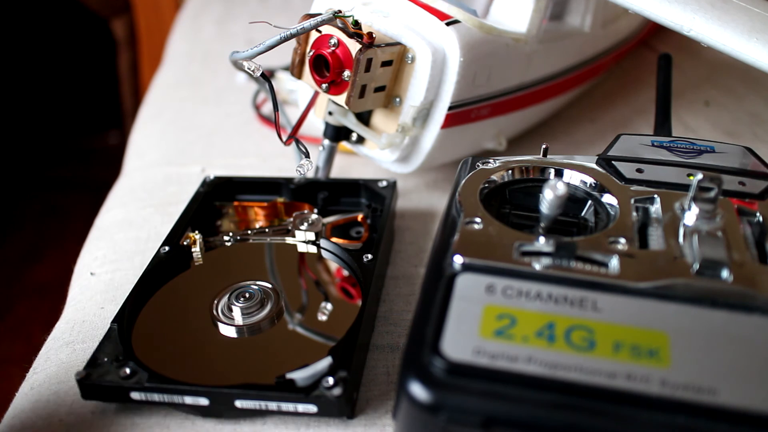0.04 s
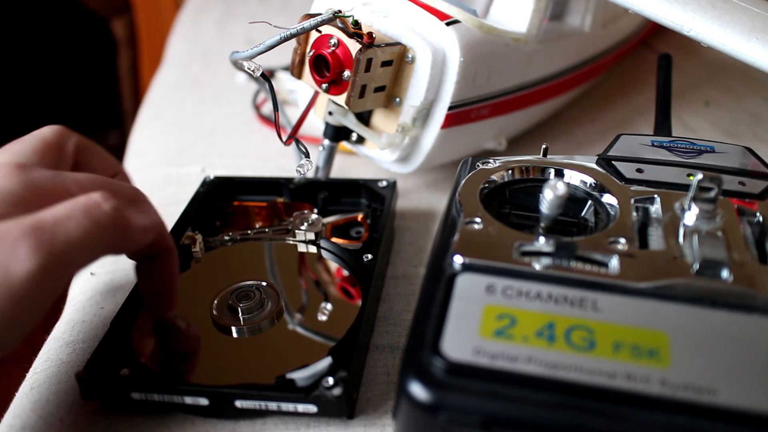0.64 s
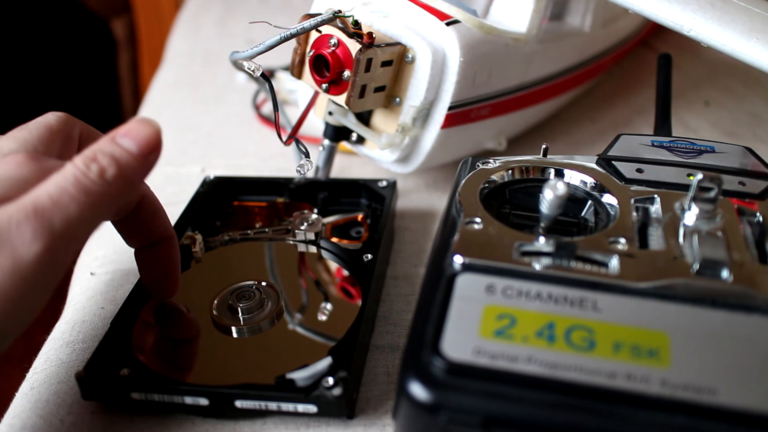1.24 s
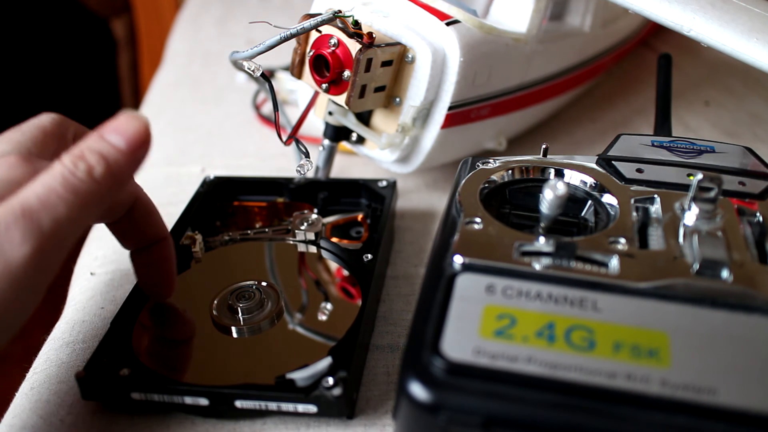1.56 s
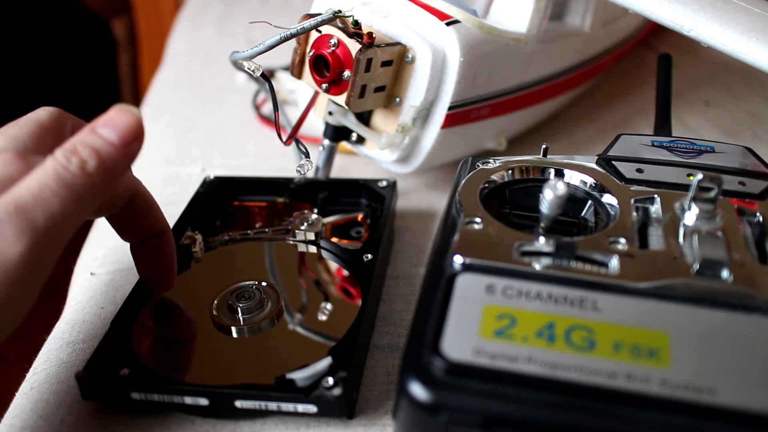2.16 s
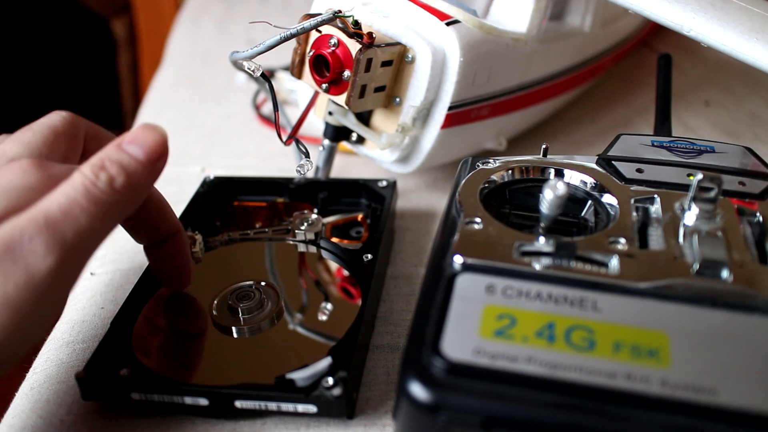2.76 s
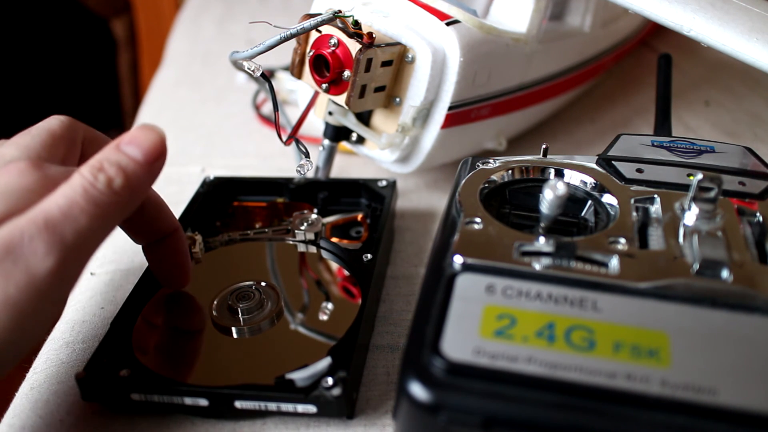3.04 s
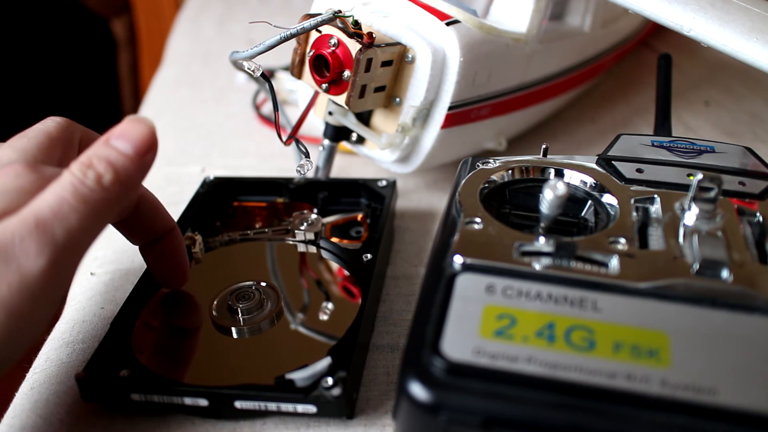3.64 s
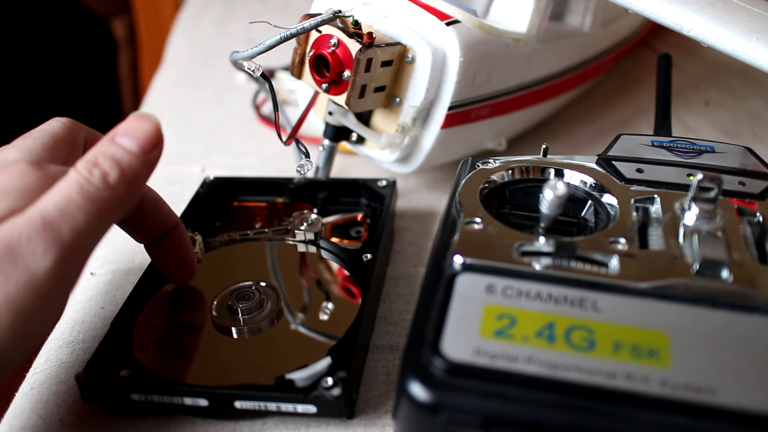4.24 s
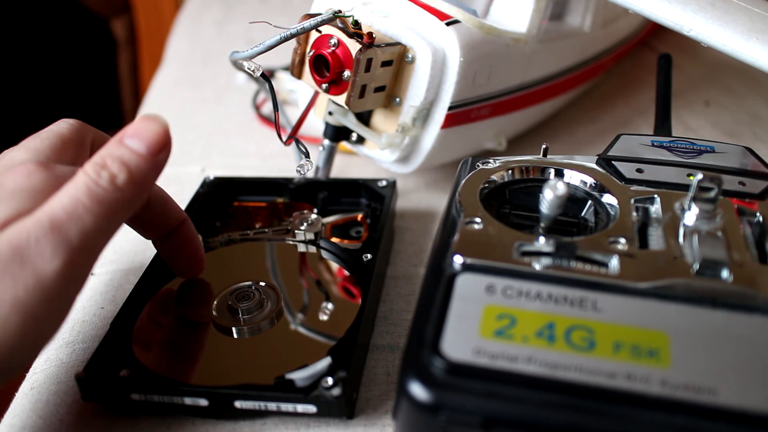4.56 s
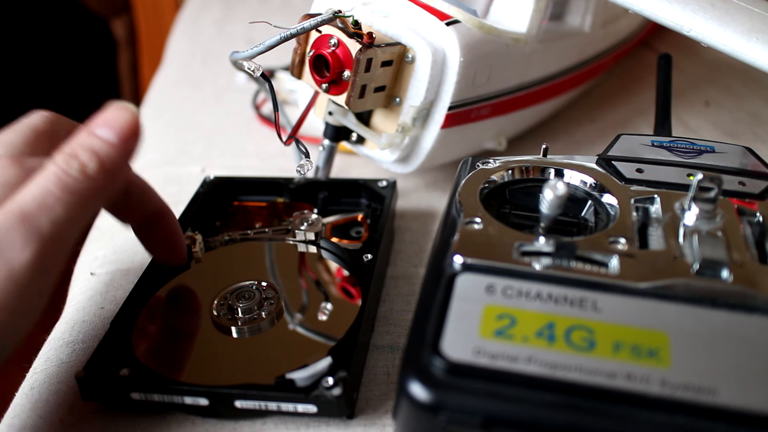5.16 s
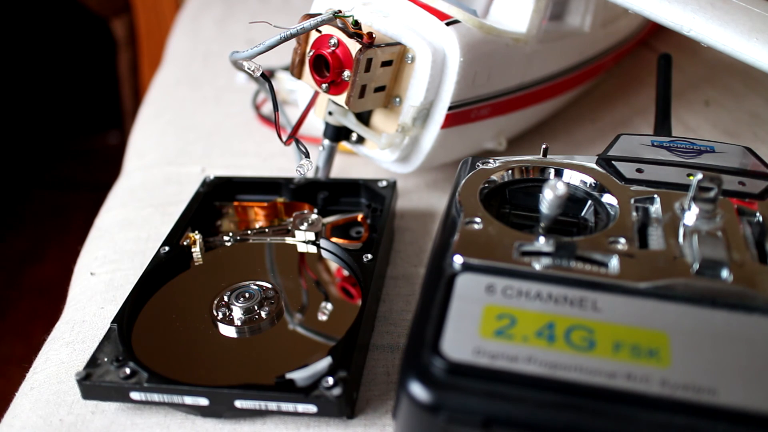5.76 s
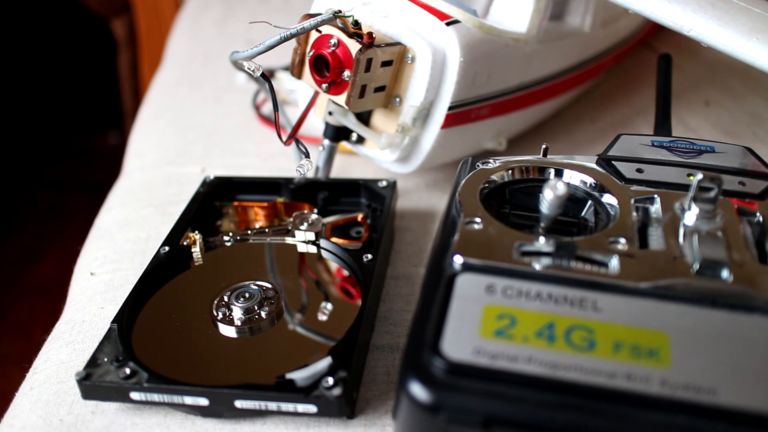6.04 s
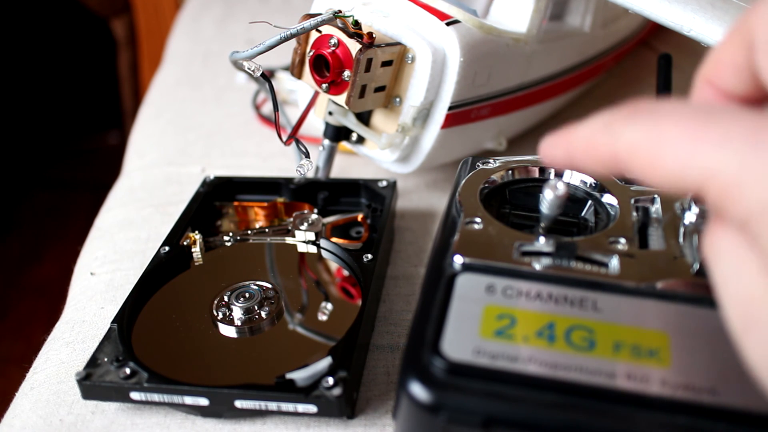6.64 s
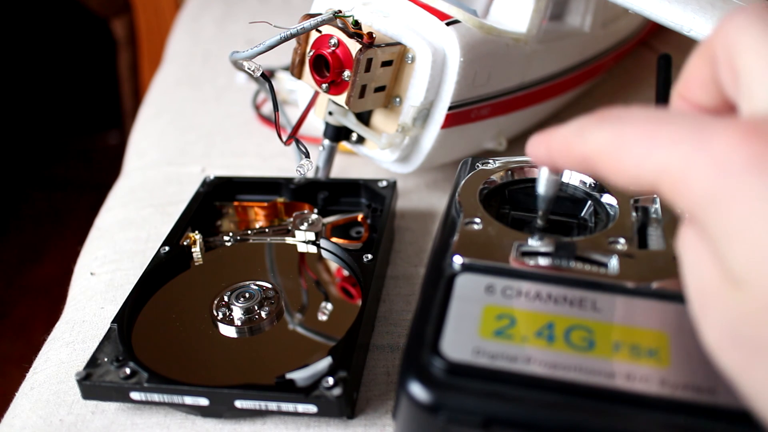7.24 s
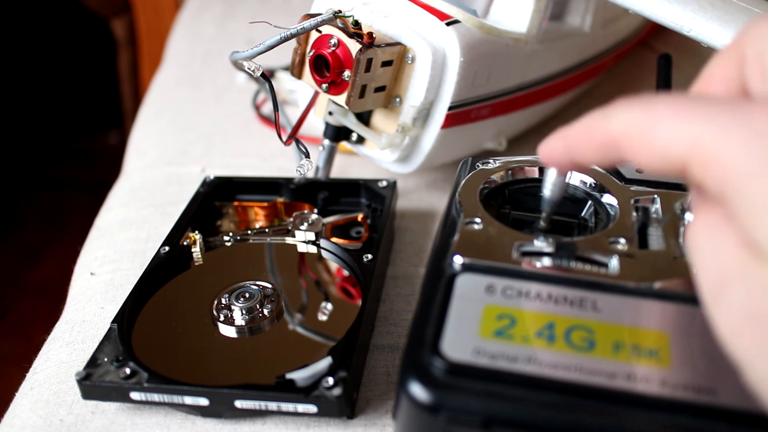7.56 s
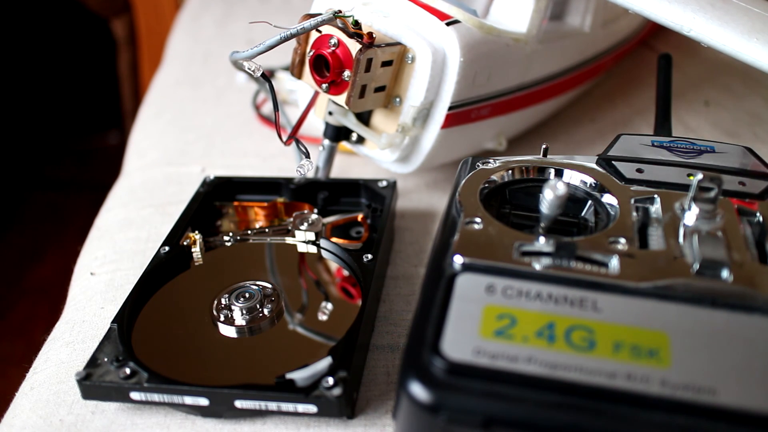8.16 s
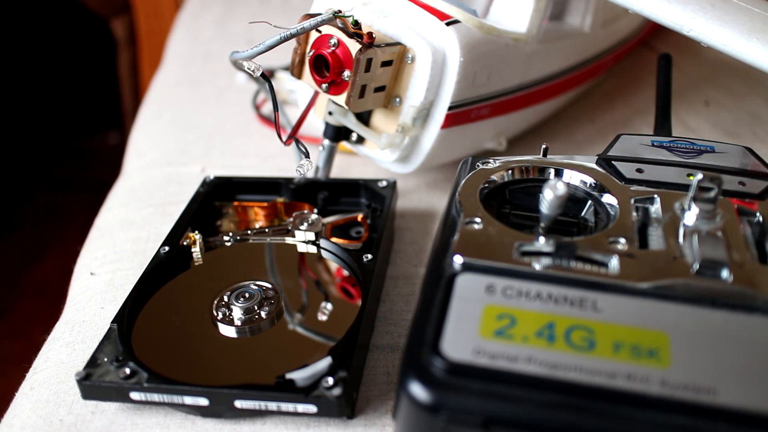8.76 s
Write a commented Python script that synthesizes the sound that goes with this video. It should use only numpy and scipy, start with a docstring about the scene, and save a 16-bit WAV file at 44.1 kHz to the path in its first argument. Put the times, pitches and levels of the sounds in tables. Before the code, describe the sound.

A fingertip brakes a whirring hard drive platter with hissing rubs, followed by faint servo buzzing and sharp plastic knocks.

```python
"""An open hard drive coasts on a cloth-covered table in a quiet room, its bearing rushing and whining.
A fingertip brakes the platter in short presses, and the rubbing skin makes the disc hiss and ring.
The rush fades and the whines glide down; just before the platter stops, a small servo starts to buzz
at its frame rate. A sleeve rustles over to the transmitter stick, the servo whirrs and jerks, and thin
whistles set in. The stick knocks back, ringing the plastic case, and the hand scuffs it as it leaves."""
import sys
import numpy as np
from scipy import signal
from scipy.fft import rfft, irfft
from scipy.io import wavfile
from scipy.ndimage import uniform_filter1d, map_coordinates

SR = 44100
rng = np.random.default_rng(int(sys.argv[2]) if len(sys.argv) > 2 else 0)


def materialize(psi):
    """Save the field psi as 16-bit PCM at rate SR to the path in sys.argv[1].

    A 1-D psi becomes a single channel; in a 2-D psi each row is a channel.
    """
    bounded = np.clip(np.atleast_2d(psi).T, -1, 1)
    quanta = np.round(bounded * 32767).astype(np.int16)
    wavfile.write(sys.argv[1], SR, quanta)


N = 396900
TIME = np.arange(N) / SR
FREQS = np.maximum(np.arange(N // 2 + 1) * SR / N, 1)
START_SPEED = 79.12   # platter turns per second
SLOW_TURN_S = (7.228, 7.356)   # start and end of the servo's slow turn
# Fingertip presses. Each row: start and end in seconds, turns per second lost, hiss and disc ring
# in relative dB.
PRESSES = [(0.662, 0.802, 0.51, -50, -58), (1.063, 1.307, 0.58, -64, -48), (1.333, 1.468, 0.91, -61, -55),
           (1.485, 1.647, 1.23, -51, -58), (1.638, 1.801, 1.23, -63, -59), (1.781, 1.93, 2.76, -51, -53.5),
           (2.012, 2.138, 1.71, -48.5, -46.5), (2.211, 2.379, 1.32, -50.5, -47),
           (2.411, 2.53, 1.63, -42, -47), (2.582, 2.8, 1.51, -53, -51.5), (2.805, 2.964, 1.38, -40, -49.5),
           (3.018, 3.243, 3.82, -41, -44.5), (3.336, 3.521, 2.63, -42, -46), (3.601, 3.871, 10, -41, -42.5),
           (3.798, 4.251, 6.45, -47.5, -48), (4.213, 4.345, 2.46, -50.5, -45),
           (4.299, 4.552, 4.3, -56, -53.5), (4.5, 4.72, 4.23, -55.5, -53.5),
           (4.679, 4.902, 4.5, -61, -58.5), (4.862, 5.047, 3.2, -76, -58.5)]


def from_db(db):
    """Decibels to gain."""
    return 10 ** (np.asarray(db) / 20)


def level(rows):
    """Gain curve through points of seconds and dB; it dies away quickly beyond its ends."""
    s, db = np.transpose(rows)
    outside = np.maximum(s[0] - TIME, 0) + np.maximum(TIME - s[-1], 0)
    return from_db(np.interp(TIME, s, db) - np.minimum(150 * outside, 100))


def held(span, fade_s):
    """Gain 1 between two times, with short fades."""
    return np.clip(np.minimum(TIME - span[0], span[1] - TIME) / fade_s + .5, 0, 1)


def swells(rows):
    """Bell-shaped swells, each with its own rise and fall."""
    power = np.zeros(N)
    for s, rise, fall, db in rows:
        distance = (TIME - s) / np.where(TIME < s, rise, fall)
        power += from_db(db) ** 2 * np.exp(-2 * np.minimum(distance ** 2, 20))
    return np.sqrt(power)


def colour(points):
    """EQ gain through points of Hz and dB, joined over log frequency."""
    hz, db = np.transpose(points)
    return from_db(np.interp(np.log(FREQS), np.log(hz), db))


def resonances(modes):
    """Frequency response of parallel resonators with alternating signs."""
    return sum((-1) ** k * from_db(db) / (1 + 1j * (FREQS ** 2 - hz ** 2) / (FREQS * width))
               for k, (hz, width, db) in enumerate(modes))


def peaks(modes):
    """Gain of resonators that are each shaken on their own, so that powers add."""
    return np.sqrt(sum(from_db(db) ** 2 / (1 + ((FREQS ** 2 - hz ** 2) / (FREQS * width)) ** 2)
                       for hz, width, db in modes))


def shaped(source, gain, band=(0, SR)):
    """Filters a signal, scaled so that unit white noise has rms 1 inside the band in Hz."""
    inside = (FREQS > band[0]) & (FREQS < band[1])
    return irfft(rfft(source) * gain / np.sqrt(np.mean(np.abs(gain) ** 2 * inside)), N)


def drift(rate_hz):
    """A smooth random wander of rms 1."""
    return shaped(rng.standard_normal(N), 1 / (1 + (FREQS / rate_hz) ** 2))


def noise(grain_db=0.0, rate_hz=200):
    """White noise of rms 1; grain makes it come in clumps."""
    x = rng.standard_normal(N) * from_db(grain_db * drift(rate_hz))
    return x / x.std()


def glide(hz):
    """A sine of rms 1 on a moving pitch."""
    return np.sqrt(2) * np.sin(2 * np.pi * (np.cumsum(hz) / SR + rng.random()))


def track_noise(turns, repeat, size=1024):
    """Noise in which the share `repeat` is the same rough track coming round on every turn."""
    bins = np.arange(size // 2 + 1)
    bumps = irfft(np.exp(2j * np.pi * rng.random(len(bins))) * (bins < size // 4))
    track = map_coordinates(bumps, [turns % 1 * size], order=1, mode="grid-wrap")
    # a slower track packs its power into a narrower band
    track *= np.sqrt(np.gradient(turns) * size / 2) / bumps.std()
    return np.sqrt(repeat) * track + np.sqrt(1 - repeat) * noise(grain_db=1.5, rate_hz=63)


def pressure(start, end):
    """One press of the finger: its samples and a half sine of height 1."""
    span = slice(int(start * SR), int(end * SR))
    return span, np.abs(np.sin(np.linspace(0, np.pi, len(TIME[span]))))


def room_tone():
    """A quiet, very wide bed of rumble and hiss."""
    # Room spectra, mid and side. Each row: frequency in Hz, relative level in dB.
    mid_colour = [(15, -39), (25, -11), (86, -2.5), (301, -9.5), (326, -6.5), (475, -7.5), (604, -11.5),
                  (709, -8.5), (769, -12), (1390, -9), (1500, -12), (5880, -20), (15000, -25.5)]
    side_colour = [(15, -37), (25, -12.5), (278, -6), (475, -7.5), (573, -8), (978, -8.5), (1500, -10),
                   (2930, -18.5), (3930, -18), (4750, -24.5), (15000, -27)]
    mid = from_db(-60) * shaped(noise(), colour(mid_colour))
    side = from_db(-56.5) * shaped(noise(), colour(side_colour))
    return mid + side * [[1], [-1]]


def platter(drag=4.32):
    """Speed in turns per second, and the finger's braking; drag and braking are speed lost per second."""
    braking = np.zeros(N)
    for start, end, lost, _, _ in PRESSES:
        span, press = pressure(start, end)
        braking[span] += lost * press * SR / press.sum()
    return np.maximum(START_SPEED - np.cumsum(drag + braking) / SR, 0), braking


def spindle(speed, turns, braking):
    """Rolling balls shake the frame: ringing races, a hum and a rush that sinks as the platter slows."""
    # Body and treble of the rush. Each row: frequency in Hz, relative level in dB.
    body_colour = [(60, -79), (150, -18.5), (300, -10), (600, -7.5), (1000, 0), (1400, 1), (2300, -2),
                   (3100, 5), (3600, 1.5), (4400, 1.5), (5000, -4), (6000, -39)]
    treble_colour = [(3800, -25.5), (4800, -6), (5300, -1.5), (6300, -1.5), (7200, -3), (8200, -1.5),
                     (9000, -5.5), (10000, -8), (11000, -15), (12500, -17.5), (16000, -22)]
    # Frame and bearing resonances. Each row: frequency and width in Hz, relative level in dB.
    frame_modes = [(277, 10, -5), (450, 150, 0.5), (658, 66, 3.5), (1010, 15, -3.7), (1429, 39, -0.2),
                   (1543, 13, 1), (1656, 13, 6), (1770, 4.5, -18), (2044, 7.4, -5), (1987, 19, 3),
                   (2060, 18, -2.2), (2156, 34, 2.5)]
    bearing_modes = [(1894, 8.5, -7), (2144, 22, -2.5), (3025, 79, -4.5), (3757, 160, 0.5), (4360, 65, -27),
                     (5060, 56, -7)]
    # Envelopes of the bearing rattle and the hum. Each row: time in seconds, level in dB.
    rattle_levels = [(0, -66), (.8, -57), (1.6, -51), (2.9, -46.5), (3.55, -49), (4.2, -44.5), (4.75, -55),
                     (5.05, -64)]
    hum_levels = [(0, -55.5), (.6, -66), (1.2, -79), (1.32, -62), (1.8, -63.5), (2.1, -71), (2.3, -85)]
    frame = colour(body_colour) * np.sqrt(1 + (1.25 * peaks(frame_modes)) ** 2)
    body = shaped(track_noise(turns, repeat=.35), frame, band=(1200, 2700))
    treble = shaped(noise(grain_db=1.0), colour(treble_colour), band=(5300, 6400))
    pace = speed / START_SPEED
    load = from_db(-38) * braking * pace   # braking lifts the rush
    rush = from_db(-39) * np.hypot(pace ** 2.21, load) * body
    rush += from_db(-45.5) * np.hypot(pace ** 2.37, 0.55 * load) * treble
    # the races are loaded once a turn, so the rattle flutters as it slows
    flutter = from_db(2.1 * (1 - pace) * np.sin(2 * np.pi * turns))
    races = flutter * track_noise(turns, repeat=0.57, size=2048)
    rattle = level(rattle_levels) * shaped(races, peaks(bearing_modes) ** 0.97)
    hum = level(hum_levels) * np.sqrt(2) * np.sin(4 * np.pi * turns)
    return rush + rattle + hum


def whines(speed, waver_hz=6.1, flicker_db=1.0, gain_db=-2.0):
    """The bearing's overtones fall with the speed; each swells and fades as it passes a resonance."""
    # Bearing overtones. Each row: cycles per turn, resonance and its width in Hz, relative level in dB.
    overtones = [(41.55, 3050, 340, -42), (41.55, 2150, 100, -48), (48.65, 3805, 80, -38),
                 (48.65, 2090, 170, -48), (51, 3965, 105, -36), (51, 3845, 130, -40), (51, 3060, 380, -44),
                 (58.35, 3570, 150, -40.5), (58.35, 3000, 190, -47.5), (60.6, 3860, 180, -37.5),
                 (69.15, 3860, 180, -44), (73.05, 3920, 170, -42.5), (73.05, 3040, 260, -45),
                 (76.3, 3930, 180, -43), (82.5, 3820, 150, -49), (90.45, 3830, 170, -46.5),
                 (100, 5060, 280, -51.5), (105, 3780, 300, -49), (120, 3780, 300, -47),
                 (137, 3780, 300, -48), (120, 2950, 250, -54)]
    out, waver = np.zeros(N), waver_hz * drift(49)
    for order, centre, width, db in overtones:
        near = np.abs(order * speed - centre) < 2 * width
        hz = order * speed[near]
        swell = .5 ** ((2 * (hz - centre) / width) ** 2)
        out[near] += from_db(db) * swell * glide(hz + waver[near])
    return out * from_db(gain_db + flicker_db * drift(40))


def fingertip(speed, turns, waver_hz=4.11):
    """Skin slips on the same marks every turn: overtones groan through the disc's modes, under a hiss."""
    # Disc resonances for hiss and ring. Each row: frequency and width in Hz, relative level in dB.
    hiss_modes = [(6810, 24, 3.5), (7020, 46, 2), (7200, 60, 0.5), (7620, 68, -0.5), (7920, 114, 2.5),
                  (8140, 42, 4.5), (9290, 91, -3), (9900, 139, -1), (10300, 139, -12), (11710, 110, -5),
                  (12400, 160, -9), (14740, 410, -12.5), (15000, 300, -15)]
    ring_modes = [(298, 22, -22), (570, 68, -22), (985, 20.3, 7.5), (1130, 110, -11), (1380, 62, -10),
                  (1650, 150, -32.5), (1920, 8.8, -2)]
    # Overtones of the skin's groan, each in cycles per turn.
    groan_orders = [15, 21.3, 22.8, 24.85, 26.2, 28.1, 29.05, 31, 35.5, 40.5]
    hiss = shaped(noise(grain_db=3.0, rate_hz=150), peaks(hiss_modes) ** 1.25, band=(6600, 10500))
    marks = track_noise(turns, repeat=.9) * from_db(1.5 * drift(60))
    disc, waver = peaks(ring_modes), waver_hz * drift(40.7)
    ring = shaped(marks, disc, band=(920, 1060))
    pace = speed / START_SPEED
    touch = held((.55, 4.85), fade_s=.1) * pace   # the finger rests lightly between presses
    hiss_gain, ring_gain = from_db(-51.5) * touch, from_db(-61.5) * touch
    for start, end, _, hiss_db, ring_db in PRESSES:
        span, press = pressure(start, end)
        hiss_gain[span] = np.hypot(hiss_gain[span], from_db(hiss_db) * press ** 0.46)
        ring_gain[span] = np.hypot(ring_gain[span], from_db(ring_db) * press ** 0.59)
        for order in groan_orders:
            hz = order * speed[span]
            ring[span] += from_db(-3.5) * np.interp(hz, FREQS, disc) ** 0.91 * glide(hz + waver[span])
    # the skin grips and slips once a turn
    stutter = from_db(2.0 * (0.5 - pace) * np.sin(2 * np.pi * turns))
    # the first firm press makes the frame drone for a moment
    drone = swells([(1.4, 0.11, .13, -55)]) * shaped(noise(), peaks([(332, 33, 0)]) ** 2)
    return stutter * (hiss_gain * hiss + from_db(-1.0) * ring_gain * ring) + drone


def servo(frame_s=.019832, kick_s=0.0047, looseness=0.26, hunt_db=1.0):
    """Each control frame kicks the motor, rattling the teeth almost alike; the slow turn whirrs."""
    # Bursts of buzz. Each row: start and end in seconds, level in dB.
    bursts = [(4.41, 4.77, -59.5), (4.77, 5.03, -57.5), (5.05, 5.37, -57.5), (5.425, 5.805, -57),
              (5.825, 6.14, -57.5), (6.16, 6.815, -57), (6.835, 7.15, -57), (7.23, 7.35, -61),
              (7.53, 7.69, -54), (7.77, 7.825, -56)]
    # Resonances of the servo and its slow gear train. Each row: frequency and width in Hz, relative dB.
    servo_modes = [(1005, 98, -2.5), (1533, 44, 2.5), (2679, 140, 2), (3240, 21, 6.5), (3597, 160, -4),
                   (3727, 93, 3), (4165, 104, 4.5), (4600, 450, -9), (4900, 88, -5), (5500, 100, -6),
                   (5950, 61, -6.5), (7700, 250, -21), (8100, 150, -21), (8740, 180, -13.5)]
    whirr_modes = [(1570, 58, 2), (3460, 93, 4), (3500, 140, -8), (5160, 320, -2.5), (8200, 700, -21)]
    frame = (TIME - 5.4349) / frame_s
    frame_starts = np.flatnonzero(np.diff(np.floor(frame))) + 1
    kicks = np.zeros(N)
    for start, end, db in bursts:
        run = frame_starts[(TIME[frame_starts] >= start) & (TIME[frame_starts] < end)]
        k = np.arange(len(run))
        # kicks come strong and weak in turn until the loop settles
        kicks[run] = from_db(db + hunt_db * (-1.0) ** k * np.exp(-k / 5))
    kicks *= from_db(0.2 * rng.standard_normal(N)) * np.sqrt(frame_s * SR)
    # a short swell of tooth contacts, then a faint chatter while the gears coast
    progress = np.minimum(TIME[:SR // 50] / kick_s, 1)
    window = np.sin(np.pi * progress) ** 2 + from_db(-24.0) * progress
    teeth = window * rng.standard_normal(len(window))
    for _ in range(20):   # even out the rattle's spectrum while keeping its outline
        teeth = irfft(np.exp(1j * np.angle(rfft(teeth))), len(window))
        teeth = window * np.tanh(teeth / np.sqrt(uniform_filter1d(teeth ** 2, size=24) + 1e-12))
    tight = signal.fftconvolve(kicks, teeth / np.linalg.norm(teeth))[:N]
    loose = signal.fftconvolve(kicks, window / np.linalg.norm(window))[:N] * noise()
    pulsing = from_db(7.1 * np.cos(2 * np.pi * (frame - .15)))
    whirr_gain = from_db(-58) * held(SLOW_TURN_S, fade_s=0.026) * pulsing
    whirr = whirr_gain * shaped(noise(), peaks(whirr_modes) ** 0.97)
    return shaped(tight + looseness * loose, resonances(servo_modes)) + whirr


def hand():
    """A sleeve rustles as the arm reaches over; the hand scuffs the case as it leaves."""
    # Sleeve sweeps and scuffs. Each row: peak time, rise and fall in seconds, level in dB.
    sweeps = [(5.67, 0.056, 0.037, -66), (6.01, 0.13, 0.17, -58.5), (6.5, 0.27, .09, -52.5),
              (6.68, .06, .2, -64), (7.31, .06, 0.054, -56), (7.7, 0.17, 0.21, -53.5)]
    scuffs = [(8.37, .025, 0.029, -60), (8.51, 0.03, 0.056, -48), (8.8, 0.17, 0.086, -64.5)]
    # Their spectra. Each row: frequency in Hz, relative level in dB.
    sleeve_colour = [(80, -21), (200, -5.5), (430, 0.5), (700, -8), (1200, -10.5), (1900, -13.5),
                     (3000, -16.5), (9500, -29), (14000, -45)]
    scuff_colour = [(150, -20), (280, -12), (370, -1), (600, -3), (900, 1), (1350, -3), (2200, -20),
                    (3600, -24), (7000, -34), (15000, -44)]
    sleeve = swells(sweeps) * shaped(noise(grain_db=1.5, rate_hz=30), colour(sleeve_colour))
    scuff = swells(scuffs) * shaped(noise(grain_db=-0.5, rate_hz=120), colour(scuff_colour))
    return sleeve + scuff


def stick(attack_s=0.00079):
    """Each knock of the stick is a short crack followed by the ring of the plastic case."""
    # Knocks. Each row: start in seconds, crack in relative dB, its t60 in seconds, case ring in dB.
    knocks = [(7.151, -46.5, 0.087, -74), (7.658, -22.5, 0.025, -50), (7.745, -35, 0.05, -49),
              (7.756, -28, 0.044, -33.5), (7.77, -40, 0.21, -49)]
    # The crack's spectrum. Each row: frequency in Hz, relative level in dB.
    crack_colour = [(60, -45), (130, -20), (200, -21), (350, 10.5), (900, 5), (1600, 2), (2300, -17),
                    (4200, -6), (6500, -11.5), (9000, -16), (15000, -45)]
    # Transmitter case modes. Each row: frequency in Hz, relative level in dB, t60 in seconds.
    case_modes = [(178, -9, 0.3), (269, -2.5, 0.14), (376, -10, 0.12), (462, -6, 0.16), (824, -2, 0.14),
                  (1105, -3, 0.16), (1540, -7, 0.13), (1630, -9, 0.083), (2100, -22, 0.26),
                  (4300, -13, .08)]
    crack, out = shaped(noise(), colour(crack_colour)), np.zeros(N)
    t = TIME[:SR // 2]
    for start, crack_db, crack_t60, ring_db in knocks:
        span = slice(int(start * SR), int(start * SR) + len(t))
        out[span] += from_db(crack_db - 3.0 - 60 * t / crack_t60) * np.minimum(t / attack_s, 1) * crack[span]
        for k, (hz, mode_db, t60) in enumerate(case_modes):
            decay = from_db(ring_db + mode_db + rng.standard_normal() - 60 * t / t60)
            out[span] += (-1) ** k * decay * np.sin(2 * np.pi * hz * t)
    # the small case radiates hardly any bass
    return signal.sosfilt(signal.butter(4, 150, "high", fs=SR, output="sos"), out)


def gears(attack_s=.003):
    """The gear teeth rasp softly in the slow turn, then flare and run out at each jerk."""
    # Jerks of the gears. Each row: start in seconds, level in dB, t60 in seconds.
    jerks = [(7.46, -40.5, 0.23), (7.755, -74, 0.45)]
    # The rasp's spectrum. Each row: frequency in Hz, relative level in dB.
    rasp_colour = [(200, -16), (900, -8), (2000, -5.5), (3500, -4), (5000, -1.5), (8000, -6), (10000, -11),
                   (13000, -26), (16000, -25)]
    gain = from_db(-72) * held(SLOW_TURN_S, fade_s=.02)
    for start, db, t60 in jerks:
        t = np.clip(TIME - start, 0, 1)
        gain += np.minimum(t / attack_s, 1) * from_db(db - 60 * t / t60)
    return gain * shaped(noise(grain_db=1.0, rate_hz=490), colour(rasp_colour))


def whistles():
    """Thin electronic whistles set in once the stick has moved, and slowly swell."""
    # Whistles. Each row: start in seconds, frequency and width in Hz, first and last level in dB.
    tones = [(7.36, 15600, 90, -73, -70), (7.7, 9740, 54, -99, -75)]
    out = np.zeros(N)
    for start, hz, width, first_db, last_db in tones:
        swell = level([(start, first_db), (N / SR, last_db)])
        out += swell * shaped(noise(), peaks([(hz, width, 0)]) ** 2)
    return out


def placed(x, pan_db, wet_db, t60=0.15):
    """Direct sound, panned left by pan_db, plus short room reflections unlike in each ear."""
    t = TIME[:SR // 3]
    tail = rng.standard_normal((2, len(t))) * from_db(-60 * t / t60) * (t > .003)
    tail /= np.sqrt(np.sum(tail ** 2, axis=1, keepdims=True))
    reflections = signal.fftconvolve(x[None], tail, axes=1)[:, :N]
    return x * from_db([[pan_db / 2], [-pan_db / 2]]) + from_db(wet_db) * reflections


def wide_treble(x, edge_hz=11500, width_db=2.0):
    """The top sounds wide and diffuse: a delayed copy is added left and right in opposite polarity."""
    top = irfft(rfft(x) / np.sqrt(1 + (edge_hz / np.maximum(FREQS, 100)) ** 40), N)
    return from_db(width_db) * np.roll(top, SR // 400) * [[1], [-1]]


def scene():
    """Drive a little to the left, servo centred behind it, transmitter further left."""
    speed, braking = platter()
    turns = np.cumsum(speed) / SR
    drive = spindle(speed, turns, braking) + whines(speed) + fingertip(speed, turns)
    drive = placed(drive, pan_db=2.0, wet_db=-11.0) + wide_treble(drive)
    buzz = placed(servo() + gears(), pan_db=0.0, wet_db=-5.0)
    handling = placed(stick() + hand(), pan_db=3.5, wet_db=-11.5, t60=0.3)
    return drive + buzz + handling + whistles() + room_tone()


def record(dry):
    """A steep low-pass cuts the top above 15.9 kHz."""
    return signal.sosfilt(signal.ellip(12, .1, 80, 15900, fs=SR, output="sos"), dry)


dry = scene()
out = record(dry)
materialize(out)
```